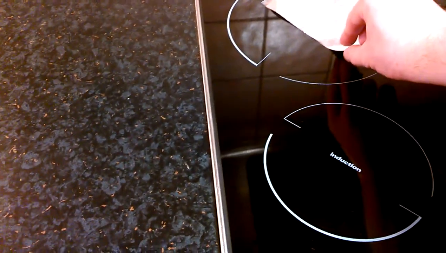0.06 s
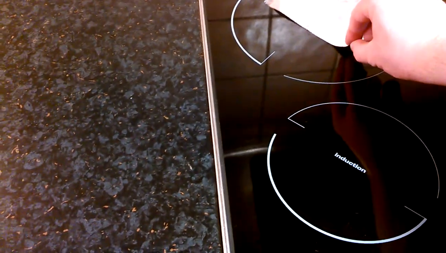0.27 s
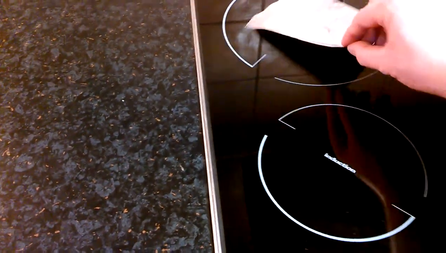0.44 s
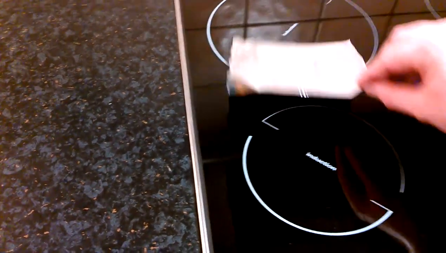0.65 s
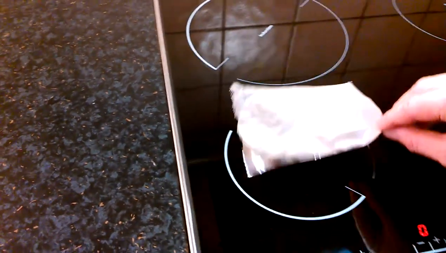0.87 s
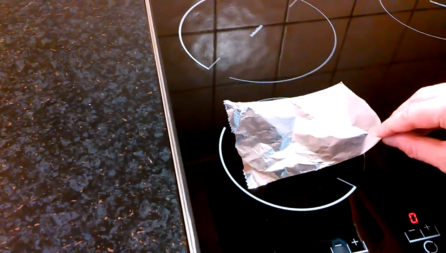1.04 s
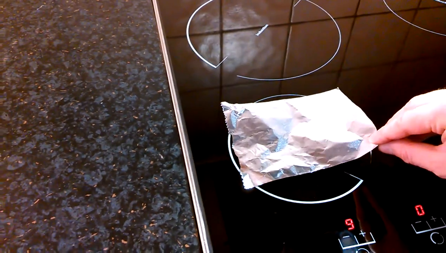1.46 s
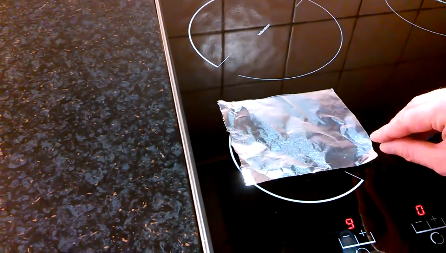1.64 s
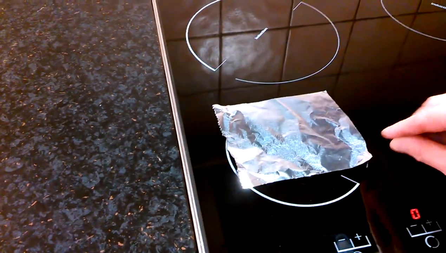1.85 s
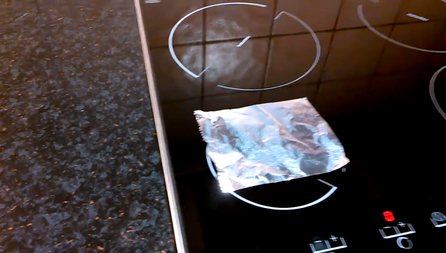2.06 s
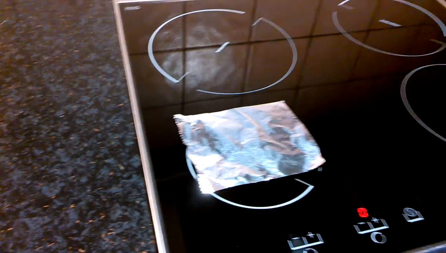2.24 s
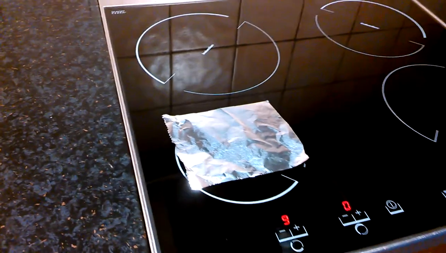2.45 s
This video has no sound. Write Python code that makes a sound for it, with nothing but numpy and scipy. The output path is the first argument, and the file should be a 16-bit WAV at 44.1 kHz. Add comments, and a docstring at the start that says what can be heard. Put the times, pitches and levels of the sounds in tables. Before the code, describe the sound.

Thin aluminium foil crinkles close by in a quiet kitchen. Faint ticks of fingers pinching it lead into crisp snaps and rustling from 0.1 seconds as it slides over a glass cooktop, loudest around 0.8 seconds. After a short pause, one crackle comes at 1.15 seconds and a last crinkle from 1.3 to 1.6 as it is let go. Faint room noise and a low hum remain.

```python
"""A quiet kitchen: crumpled aluminium foil is pulled across a glass cooktop, laid down and let go.
Creases snap in bursts of tiny clicks, small panels pop through and ring, edges scrape over the glass.
Glass and a tiled wall throw the sound back; room noise, a low hum and a thin whine lie under it."""
import sys
import numpy as np
from scipy import signal
from scipy.fft import rfft, irfft
from scipy.io import wavfile

SR = 44100
rng = np.random.default_rng(int(sys.argv[2]) if len(sys.argv) > 2 else 0)


def to_wav(s):
    """Save 16-bit WAV."""
    ch = np.atleast_2d(s).T  # columns
    pcm = np.round(np.clip(ch, -1, 1) * 32767)  # PCM
    wavfile.write(sys.argv[1], SR, pcm.astype(np.int16))


N = 110250
T = np.arange(N) / SR
CREASE_RISE_S, CUTOFF_HZ = 0.0006, 15480

# sheet movements: start_s, length_s, first_db, last_db, body_db, top_db
RUBS = [(0, 0.034, -83, -71, -2, 1), (0.184, 0.039, -47, -56, 4, 0), (.224, 0.038, -46.5, -36, 0.5, 2),
        (0.298, .045, -53, -38, -6, -11), (.342, .04, -37.5, -36, 0.5, 4),
        (0.379, 0.056, -42.5, -45, 2.5, -6.5), (0.435, .032, -36, -37, 2, -2.5),
        (.47, 0.025, -42, -36.5, 4, -1.5), (0.507, 0.026, -37.5, -39.5, 4.5, -2),
        (0.539, 0.048, -37.5, -43, 3, -4.5), (0.59, 0.047, -51.5, -53.5, 9, -2),
        (.635, 0.036, -34.5, -38.5, 4.5, 0.5), (.668, 0.052, -32.5, -30.5, -1.5, -0.5),
        (.712, 0.025, -31.5, -28.5, -1, -5.5), (0.741, 0.021, -40, -30.5, 1.5, -1),
        (0.771, 0.042, -44, -35, 1.5, -4.5), (0.825, .048, -32.5, -33, 2.5, -1),
        (0.877, 0.029, -46, -51, 5, -13), (0.931, 0.071, -64, -71, 1, -2), (1.318, 0.015, -35, -39, -3, -5),
        (1.338, 0.039, -43.5, -48.5, 3.5, -6), (1.381, 0.043, -45, -48.5, -1, -12),
        (1.426, 0.0637, -38, -34.5, -8, -1), (1.496, 0.027, -39, -40.5, -9.5, 7.5),
        (1.527, 0.014, -44, -52, 3, 9), (1.586, .014, -60, -59, -13, -1)]


def snaps(burst_s=0.0025, settle_power=1.06, size=8192):
    """Creases give way: a sharp burst, then the crackle of the sheet settling."""
    # start_s, level_db, crackle_db, settle_s, body_db, top_db
    creases = [(0.0268, -41.5, -28, .01, 2, -3), (.1335, -25.5, -17, 0.02, -8, -1),
               (.190, -41.5, 0, 0.026, -15, -3), (.2392, -33.5, -3, .02, -16, -5),
               (0.2824, -26, -3.5, 0.023, 2, -0.5), (.310, -34.5, -7, .01, 8, -6),
               (.351, -30.5, -5, 0.022, -2.5, -20), (0.4347, -34, -8, .012, -12, 6),
               (.445, -30, -15, .01, -2, 0), (.458, -28.5, -13, .012, 2, 2), (0.51, -38, -6, 0.014, -3, -6),
               (0.5502, -35, -4, .015, 4, 1), (.6235, -43, -3, .012, 16, -11),
               (.6355, -34, -7.5, 0.014, 6, 0), (0.6687, -33, -8, .015, 7, -1),
               (0.713, -30, -10, .015, 6, 1), (.7305, -34, -16, 0.0092, 0, -16),
               (.7545, -33, -11, .012, 10, -32), (0.8005, -21, -14, 0.015, -5, 8),
               (.8215, -20, -7, 0.013, -6.5, -3.5), (.839, -36, -5, .01, 5, 6),
               (.859, -31, -9, 0.015, 19.5, 6), (.954, -48.5, -6.5, 0.016, 1, -10),
               (1.1546, -28, -6.5, 0.025, -1.5, 0), (1.3035, -49.5, 1, 0.019, 2.5, -14),
               (1.3152, -30, -5, 0.017, 1.5, 3.5), (1.380, -44, -0.5, .015, -6, -13),
               (1.4001, -28.5, -15, .008, -5, 6), (1.428, -34, -6, 0.014, -2, -9),
               (1.504, -28, -4.5, 0.017, -19, 2), (1.586, -60, 3.5, 0.018, 1, -3)]
    out, t = np.zeros(N), T[:size]
    for start_s, level_db, crackle_db, settle_s, body_db, top_db in creases:
        crackle = amp(crackle_db) * np.exp(-(t / settle_s) ** settle_power)
        envelope = np.minimum(t / CREASE_RISE_S, 1) * np.hypot(np.exp(-t / burst_s), crackle)
        add(out, start_s, sheet(amp(level_db) * envelope * grit(size), start_s, body_db, top_db))
    return out


def rubs(rise_s=0.0023, fade_s=0.01, size=8192):
    """Wrinkles catch and slip while the sheet moves."""
    out, t = np.zeros(N), T[:size]
    for start_s, length_s, first_db, last_db, body_db, top_db in RUBS:
        gain = amp(np.interp(t, [0, length_s], [first_db, last_db]))
        envelope = np.minimum(t / rise_s, 1) * np.exp(-np.maximum(t - length_s, 0) / fade_s)
        add(out, start_s, sheet(gain * envelope * grit(size), start_s, body_db, top_db))
    return out


def grit(size, clicks_per_s=9000, spread_db=1.5, clump_db=0.5, clump_s=0.002):
    """Dense, clumped train of tiny uneven clicks."""
    clicks = (rng.random(size) < clicks_per_s / SR) * rng.choice([-1, 1], size)
    strength_db = spread_db * np.minimum(rng.exponential(1, size), 4)
    clumps = noise(lambda f: (f > 60) / (1 + (f * clump_s) ** 2), size)
    return unit(clicks * amp(strength_db + clump_db * clumps))


def sheet(drive, start_s, body_db, top_db, flex=0.02, size=2048):
    """Clicks ring briefly in the foil; each bend shifts its resonances."""
    hz = np.fft.rfftfreq(size, 1 / SR)
    gain = amp(colour_db(hz * (1 + flex * rng.uniform(-1, 1)), start_s, body_db, top_db))
    gain /= np.sqrt(np.mean(gain ** 2 * (hz < CUTOFF_HZ)))
    log_gain = np.log(np.r_[gain, gain[-2:0:-1]])
    minimum_phase = np.exp(signal.hilbert(log_gain).conj())
    return signal.fftconvolve(drive, np.fft.ifft(minimum_phase).real)


def colour_db(hz, start_s, body_db, top_db, laid_s=0.62, body_hz=5570, top_hz=10860):
    """Spectrum of the sheet as it lies at that moment, plus low and high shelves."""
    # sheet pinched at the back of the cooktop: frequency_hz, gain_db
    pinched = [(100, -50), (450, -37), (850, -21), (1400, -23.5), (2000, -21), (2500, -15), (3100, -20.5),
               (4000, -9.5), (5200, -16), (6500, -9), (8400, 1), (9800, -3.5), (11300, -1), (12600, -4),
               (14000, 0.5), (15500, -1)]
    # sheet spread on the glass: frequency_hz, gain_db
    spread = [(100, -35), (500, -43), (800, -25), (1300, -30.5), (1900, -20), (2500, -15), (3200, -17),
              (4200, -8.5), (4900, -12.5), (6800, -9), (8200, -3.5), (9400, 0), (11000, -3.5),
              (12400, -6.5), (13800, 2.5), (15500, 2.5)]
    low_db = body_db / (1 + (hz / body_hz) ** 8)
    high_db = top_db / (1 + (top_hz / (hz + 1)) ** 12)
    return read(pinched if start_s < laid_s else spread, hz) + low_db + high_db


def strays(pops_per_s=260, low_hz=1703, high_hz=15000, t60_s=0.012, spread_db=3.5, count=32):
    """Single wrinkles pop at random times and pitches while the sheet moves."""
    out, t = np.zeros(N), T[:1024]
    envelope = 2 * amp(-3) * decay(t, t60_s)
    for start_s, length_s, first_db, last_db, body_db, top_db in RUBS:
        delays_s = rng.exponential(1, count).cumsum() / pops_per_s
        pitches_hz = low_hz * (high_hz / low_hz) ** rng.random(count)
        offsets_db = spread_db * rng.standard_normal(count)
        for delay_s, hz, offset_db in zip(delays_s, pitches_hz, offsets_db):
            if delay_s < length_s:
                rub_db = np.interp(delay_s, [0, length_s], [first_db, last_db])
                gain = amp(rub_db + colour_db(hz, start_s, body_db, top_db) + offset_db)
                add(out, start_s + delay_s, gain * envelope * np.sin(2 * np.pi * hz * t))
    return out


def pops(rise_s=0.00066, bend=0.029, size=8192):
    """Small panels flip and ring at an unsteady pitch."""
    # start_s, pitch_hz, level_db, t60_s
    panels = [(0.135, 1114, -55.5, 0.035), (0.136, 2400, -56, 0.027), (.14, 610, -60, 0.19),
              (.2822, 950, -44.5, 0.021), (0.2818, 1400, -39, 0.0083), (0.2824, 1830, -39, 0.018),
              (.284, 2530, -42, 0.068), (.284, 3564, -43.5, 0.1), (.289, 4010, -39.5, 0.058),
              (0.351, 2432, -36.5, .05), (.353, 4340, -48, .04), (.376, 1805, -50, 0.055),
              (0.416, 1827, -49.5, .06), (0.801, 2980, -30.5, 0.013), (0.84, 2830, -39, 0.03),
              (1.1538, 2620, -49.5, 0.095), (1.1554, 3180, -44, 0.011), (1.155, 3670, -38.5, 0.017)]
    out, t = np.zeros(N), T[:size]
    for start_s, pitch_hz, level_db, t60_s in panels:
        cycles = np.cumsum(pitch_hz * (1 + bend * noise(lambda f: f < 500, size))) / SR
        envelope = np.minimum(t / rise_s, 1) * decay(t, t60_s)
        add(out, start_s, amp(level_db) * envelope * np.sin(2 * np.pi * cycles))
    return out


def singing_edge():
    """The dragged edge sings for moments in narrow bands."""
    # peak_s, half_length_s, pitch_hz, width_hz, level_db
    sings = [(.148, 0.0067, 8400, 300, -62.5), (.243, 0.026, 2600, 150, -58.5),
             (.252, 0.0082, 8500, 700, -36.5), (.335, 0.015, 8500, 500, -45),
             (.362, 0.014, 8300, 900, -35.5), (0.766, 0.073, 810, 140, -67.5),
             (1.425, 0.062, 4350, 500, -54.5)]
    return sum(swell(*row) for row in sings)


def finger_ticks(decay_s=0.0044, width_hz=1500, upper_hz=11500, upper_db=-3.5, size=2048):
    """Fingertips pinch the corner; tiny creases click in two resonances."""
    # start_s, pitch_hz, level_db
    ticks = [(.0072, 8200, -56.5), (0.013, 8200, -49), (0.023, 8050, -46.5), (0.027, 8350, -47),
             (0.0538, 8400, -53), (0.0692, 8300, -54.5)]
    out, t = np.zeros(N), T[:size]
    envelope = np.minimum(t / CREASE_RISE_S, 1) * np.exp(-(t / decay_s) ** 2)
    for start_s, pitch_hz, level_db in ticks:
        ring = band(pitch_hz, width_hz, size) + amp(upper_db) * band(upper_hz, 2 * width_hz, size)
        add(out, start_s, amp(level_db) * envelope * ring)
    return out


def near_echoes(x, step_s=0.035, count=4):
    """Echoes off glass and tiles; the moving sheet crossfades through echo patterns."""
    # frequency_hz, t60_s
    decays = [(500, 0.062), (4000, 0.13), (15000, 0.082)]
    out = np.zeros(N)
    for k in range(count):
        steps_away = abs((T / step_s - k + count / 2) % count - count / 2)
        out += echoes(x * np.cos(np.pi / 2 * np.minimum(steps_away, 1)), decays, delay_s=0.0013)
    return out


def room_echoes(x):
    """Kitchen reverberation; treble dies first."""
    # frequency_hz, t60_s
    decays = [(500, 1), (2500, 0.74), (8000, 0.46), (15000, 0.1)]
    return echoes(x, decays, delay_s=0.013)


def echoes(x, decays, delay_s):
    """Diffuse tail, each band dying at its own rate."""
    hz, t, spectra = signal.stft(rng.standard_normal(SR // 2), SR, nperseg=128)
    tail = signal.istft(spectra * decay(t, read(decays, hz)[:, None]), SR, nperseg=128)[1]
    tail *= T[:len(tail)] > delay_s
    return signal.fftconvolve(x, tail / np.linalg.norm(tail))[:N]


def hum(pitch_hz=110, waver_hz=6.15, flicker_db=2):
    """Low wavering hum that swells near the end."""
    # time_s, level_db
    levels = [(0, -80), (.9, -78.5), (1.05, -86), (1.4, -78), (1.72, -87), (1.81, -74), (1.94, -66.5),
              (1.99, -84), (2.5, -90)]
    cycles = np.cumsum(pitch_hz + waver_hz * noise(lambda f: f < 15)) / SR
    level_db = np.interp(T, *np.transpose(levels)) + flicker_db * noise(lambda f: f < 10)
    return amp(level_db) * unit(np.sin(2 * np.pi * cycles))


def room_noise():
    """Still air, faint appliance tones and low swells."""
    # frequency_hz, density_db
    air_spectrum = [(15, -30), (25, -10), (79, -21.5), (113, -7), (144, -13), (198, -17), (260, -13.5),
                    (631, -14.5), (826, -16), (1080, -19), (2490, -22), (4150, -27.5), (11500, -26),
                    (13900, -28.5), (15500, -23.5)]
    # pitch_hz, width_hz, level_db
    appliances = [(274, 51, -80.5), (824, 97, -81), (14200, 62, -81)]
    # drift of air and tones: time_s, gain_db
    drift = [(0, 3.5), (.6, 3.5), (1.1, 1), (1.5, 2.5), (1.9, 0), (2.2, -1), (2.5, -1.5)]
    # peak_s, half_length_s, pitch_hz, width_hz, level_db
    swells = [(0.497, .15, 54.4, 40, -79), (1.15, 0.12, 300, 50, -76), (1.45, 0.085, 347, 80, -70.5),
              (1.91, .05, 285, 90, -75.5), (2.267, 0.096, 45, 35, -75.5)]
    air = amp(-67.5) * noise(lambda f: amp(read(air_spectrum, f)))
    tones = sum(amp(db) * band(hz, width_hz) for hz, width_hz, db in appliances)
    return amp(np.interp(T, *np.transpose(drift))) * (air + tones) + sum(swell(*row) for row in swells)


def swell(peak_s, half_length_s, pitch_hz, width_hz, level_db):
    """One noisy resonance grows and dies away."""
    return amp(level_db) * np.exp(-((T - peak_s) / half_length_s) ** 2) * band(pitch_hz, width_hz)


def band(hz, width_hz, size=N):
    """Noise in one resonance."""
    return noise(lambda f: 1 / (1 + (2 * (f - hz) / width_hz) ** 2), size)


def noise(shape, size=N):
    """Noise of rms 1 with spectrum shape(hz)."""
    return unit(irfft(rfft(rng.standard_normal(size)) * shape(np.fft.rfftfreq(size, 1 / SR)), size))


def decay(t, t60_s):
    """Falls 60 dB in t60_s."""
    return np.exp(-np.log(1000) * t / t60_s)


def amp(db):
    """Decibels to gain."""
    return 10 ** (np.asarray(db) / 20)


def unit(x):
    """Scales to rms 1."""
    return x / np.sqrt(np.mean(abs(x) ** 2) + 1e-20)


def read(points, hz):
    """Reads a table on a log-frequency axis."""
    f, value = np.transpose(points)
    return np.interp(np.log(hz + 1), np.log(f + 1), value)


def add(mix, start_s, sound):
    """Mixes a sound in at start_s."""
    part = mix[max(round(start_s * SR), 0):][:len(sound)]
    part += sound[:len(part)]


def scene():
    """Foil, echoes and kitchen background, mono."""
    foil = snaps() + rubs() + strays() + pops() + singing_edge()
    ticks = finger_ticks()
    wet = amp(-7) * near_echoes(foil) + amp(-19) * room_echoes(foil + ticks)
    return (foil + ticks + wet + hum() + room_noise())[None]


def record(dry):
    """Steep low-pass at CUTOFF_HZ."""
    taps = signal.firwin(401, CUTOFF_HZ, window=("kaiser", 8), fs=SR)
    return signal.oaconvolve(dry, taps[None], "same")


dry = scene()
out = record(dry)
to_wav(out)
```